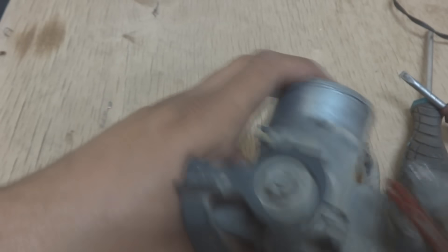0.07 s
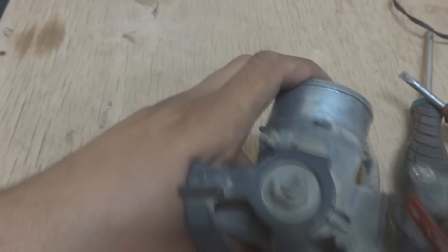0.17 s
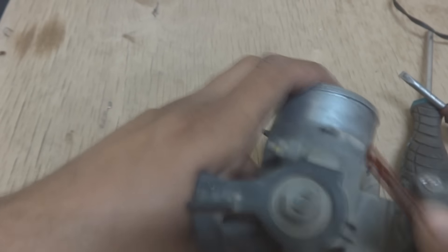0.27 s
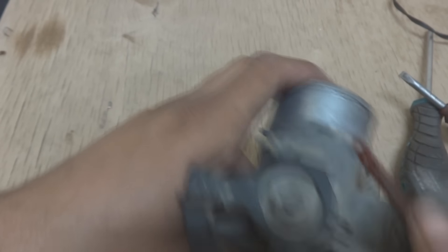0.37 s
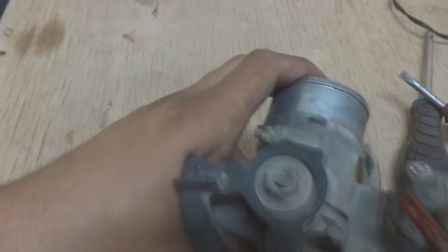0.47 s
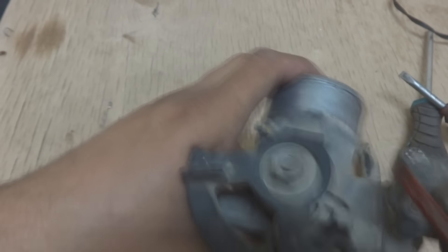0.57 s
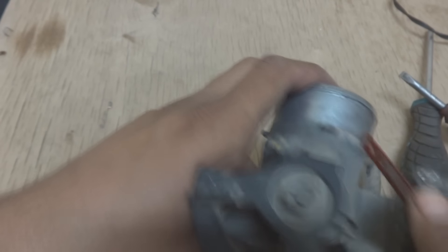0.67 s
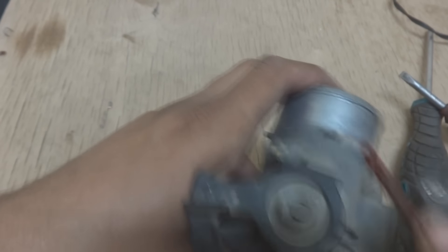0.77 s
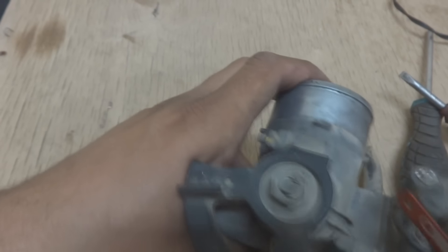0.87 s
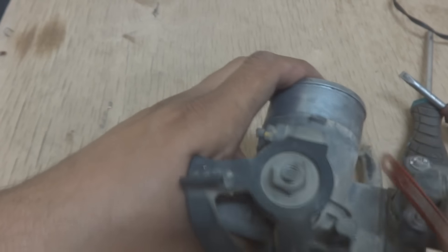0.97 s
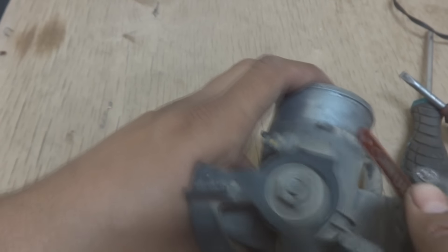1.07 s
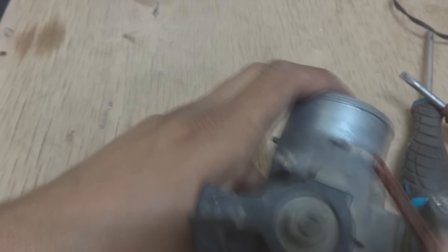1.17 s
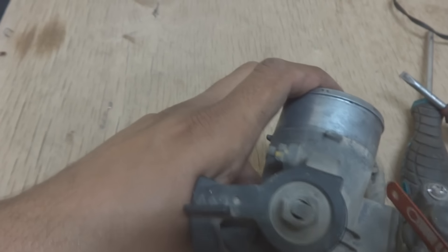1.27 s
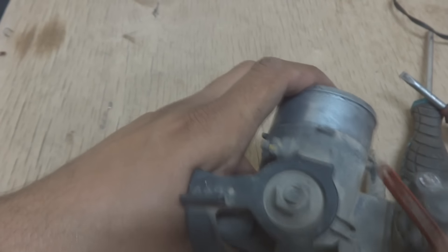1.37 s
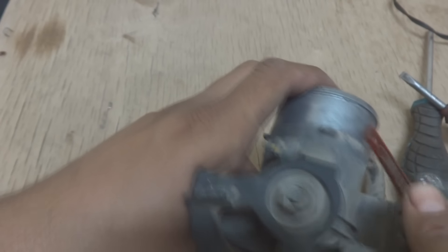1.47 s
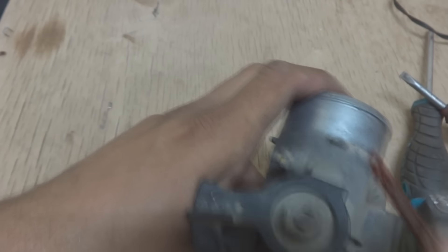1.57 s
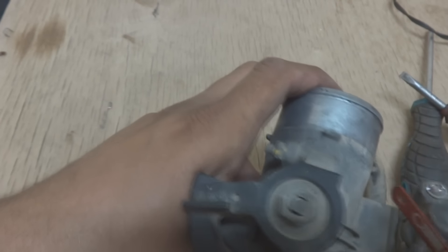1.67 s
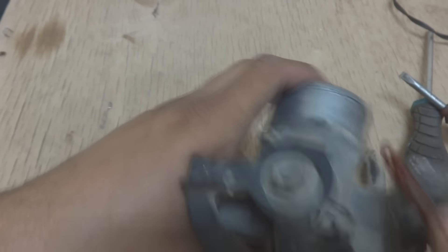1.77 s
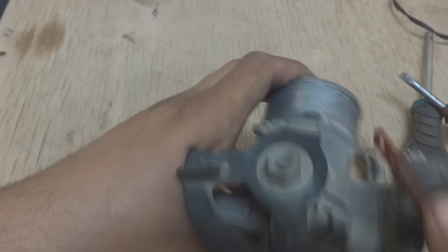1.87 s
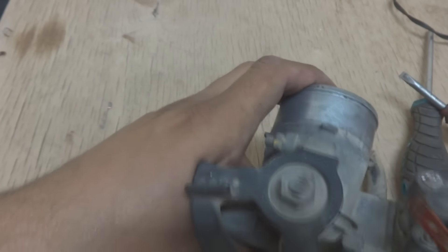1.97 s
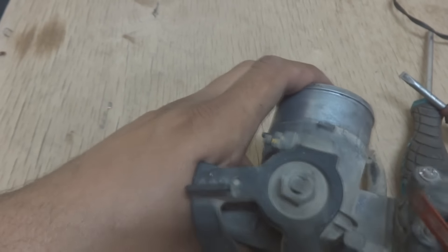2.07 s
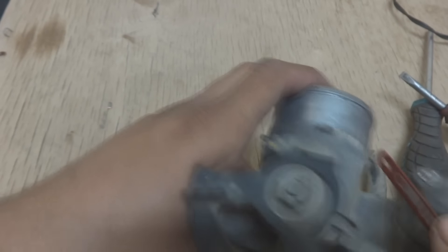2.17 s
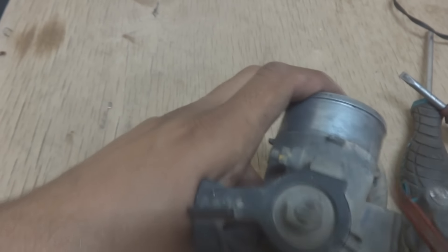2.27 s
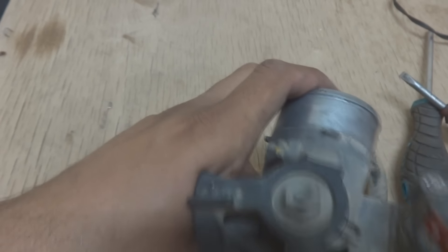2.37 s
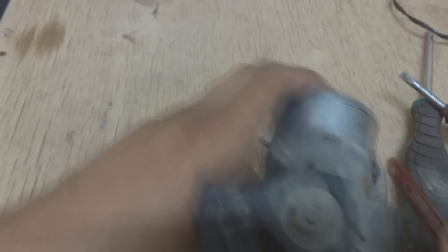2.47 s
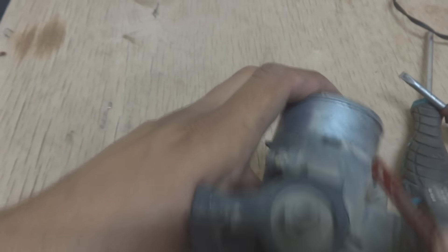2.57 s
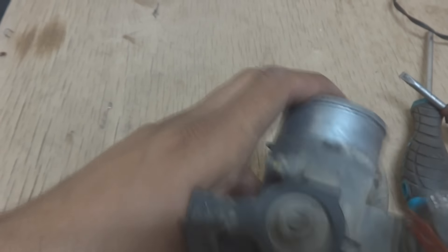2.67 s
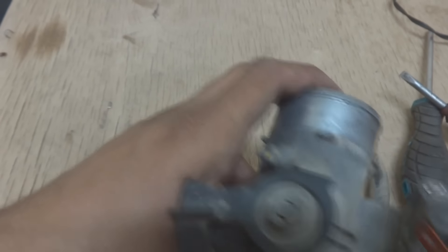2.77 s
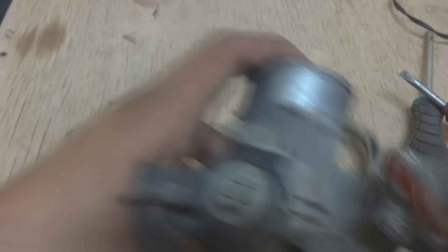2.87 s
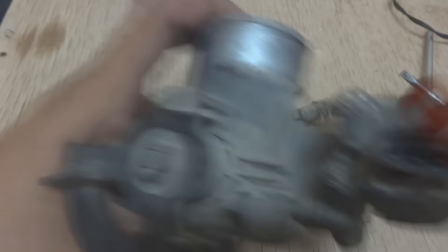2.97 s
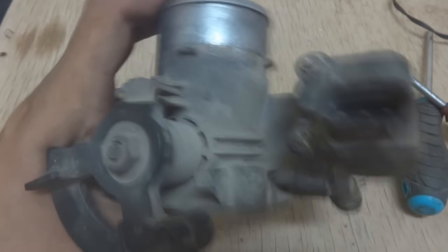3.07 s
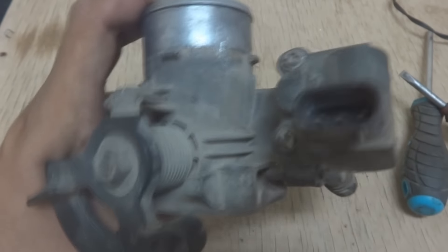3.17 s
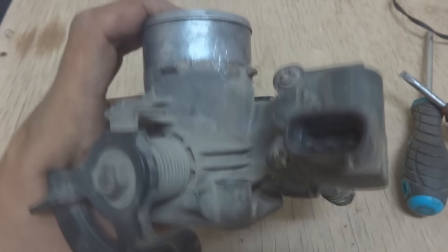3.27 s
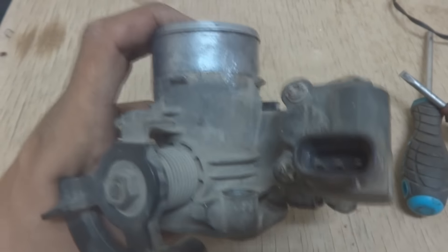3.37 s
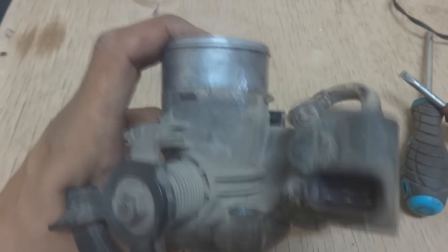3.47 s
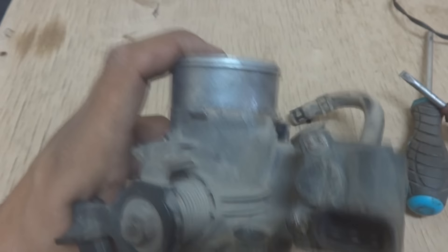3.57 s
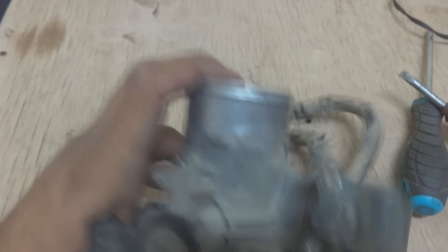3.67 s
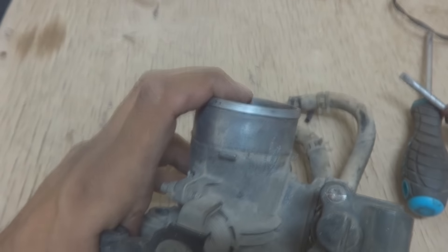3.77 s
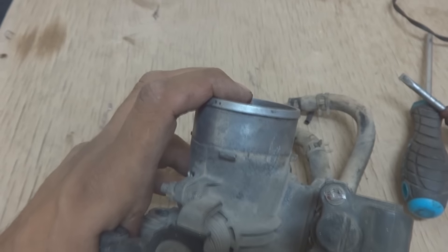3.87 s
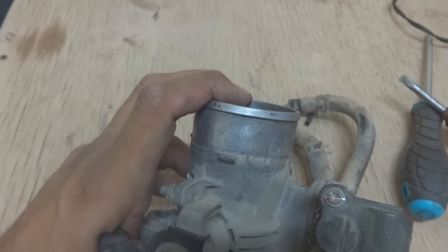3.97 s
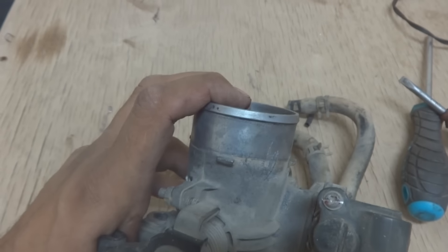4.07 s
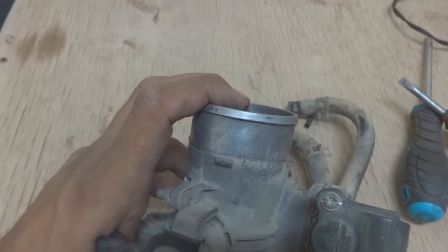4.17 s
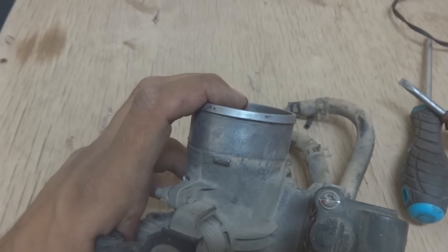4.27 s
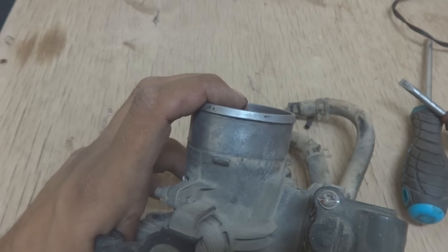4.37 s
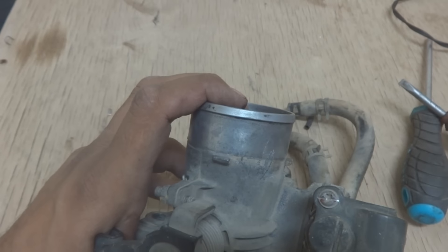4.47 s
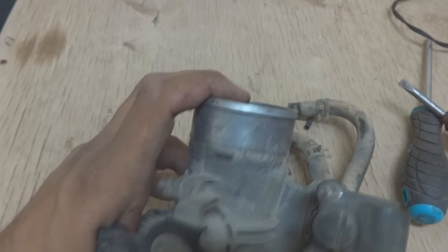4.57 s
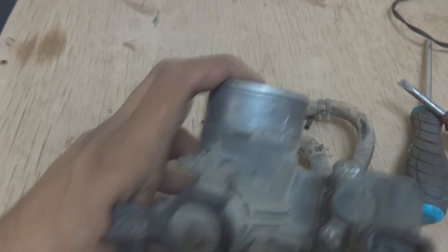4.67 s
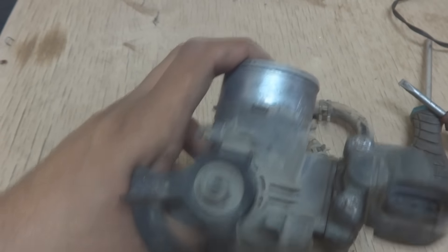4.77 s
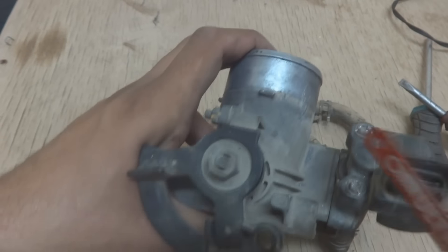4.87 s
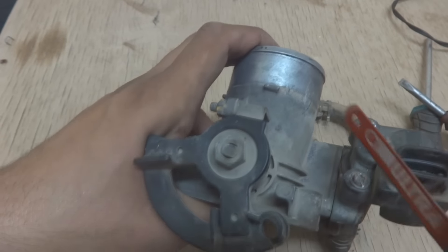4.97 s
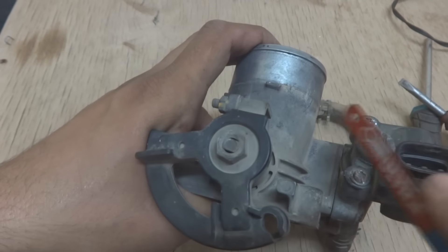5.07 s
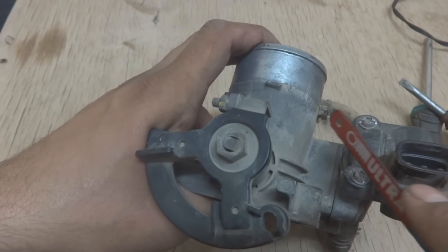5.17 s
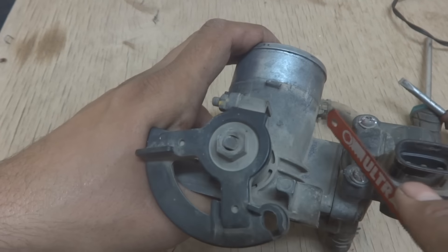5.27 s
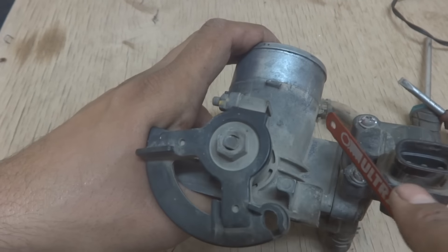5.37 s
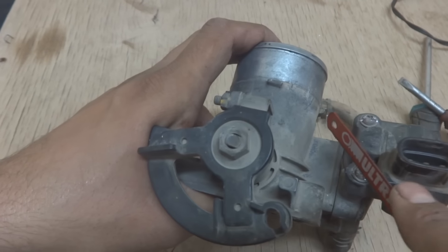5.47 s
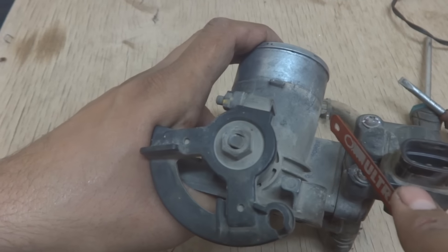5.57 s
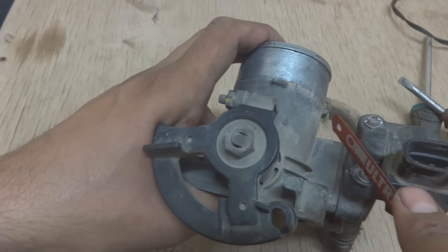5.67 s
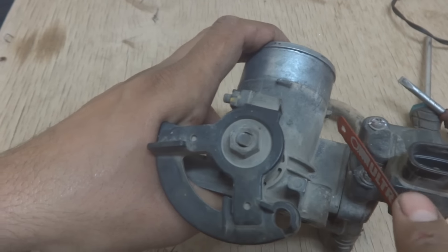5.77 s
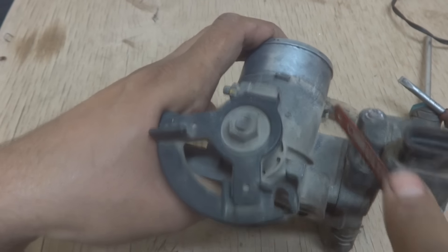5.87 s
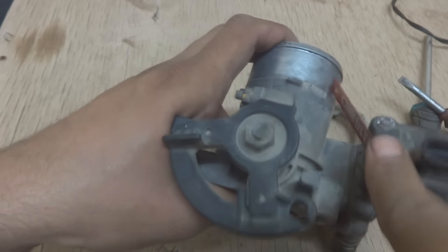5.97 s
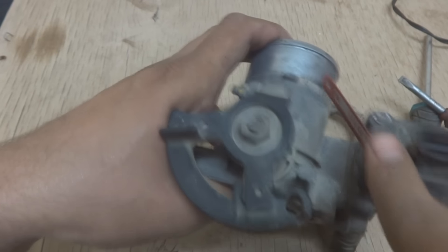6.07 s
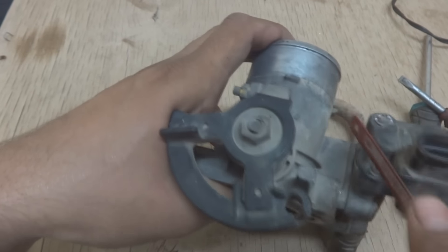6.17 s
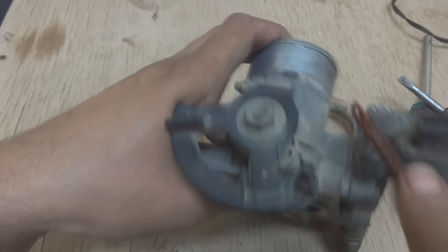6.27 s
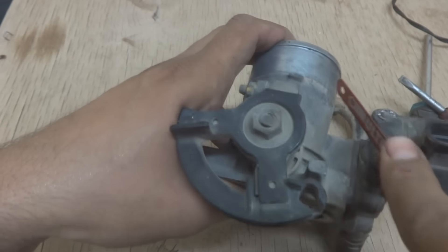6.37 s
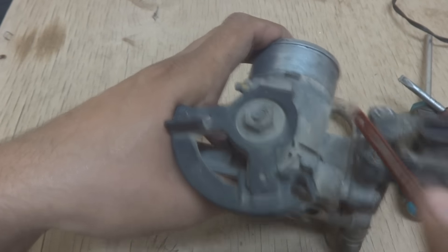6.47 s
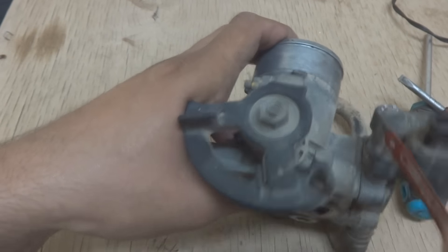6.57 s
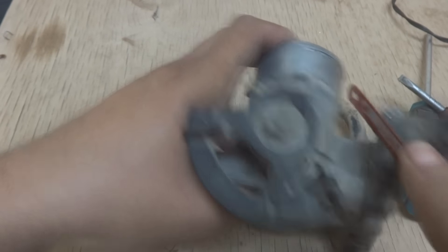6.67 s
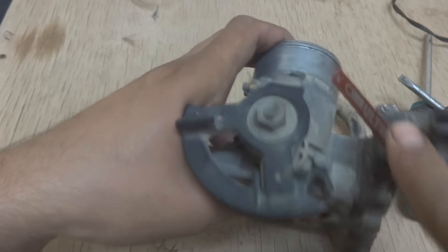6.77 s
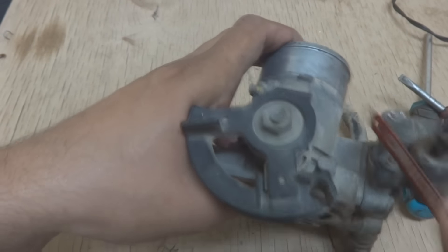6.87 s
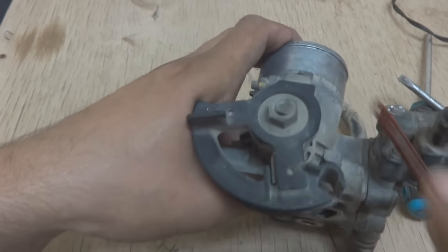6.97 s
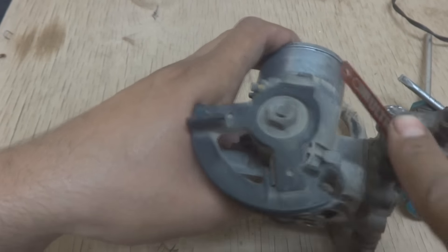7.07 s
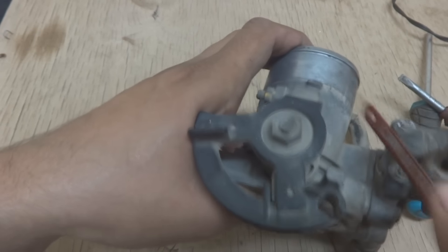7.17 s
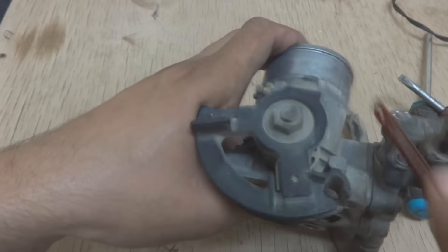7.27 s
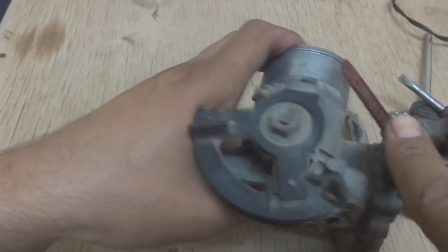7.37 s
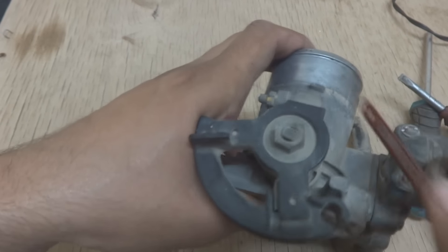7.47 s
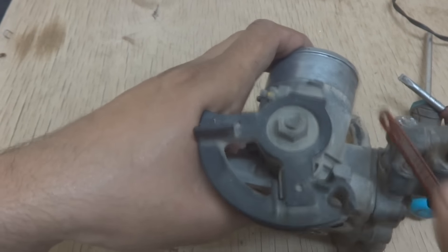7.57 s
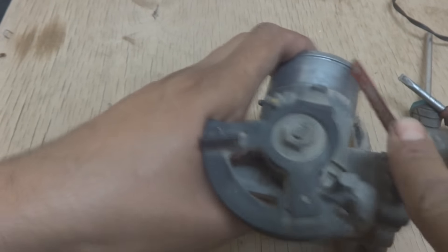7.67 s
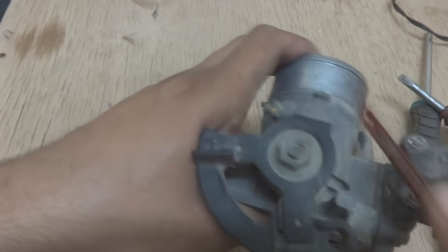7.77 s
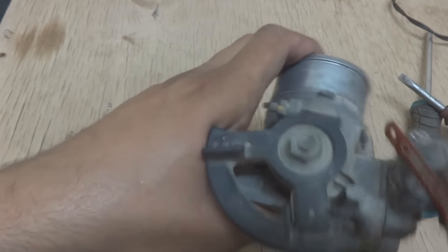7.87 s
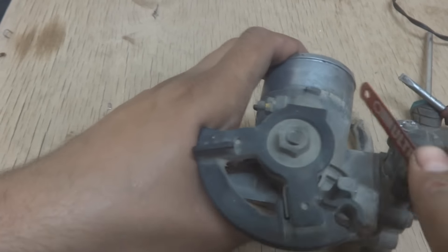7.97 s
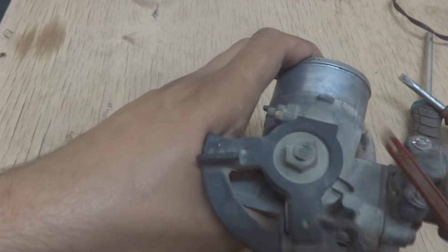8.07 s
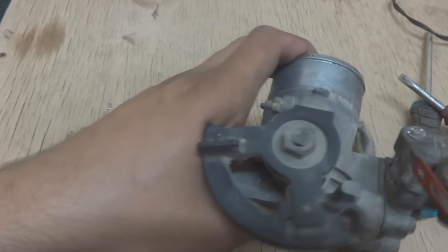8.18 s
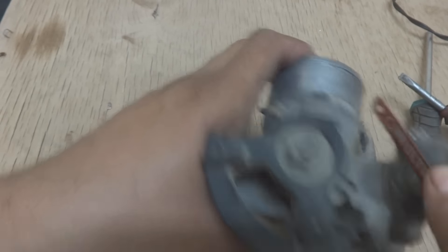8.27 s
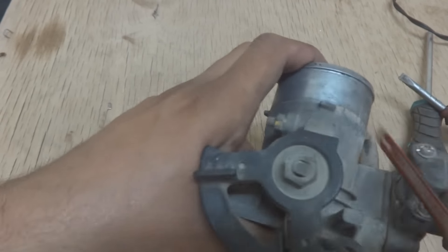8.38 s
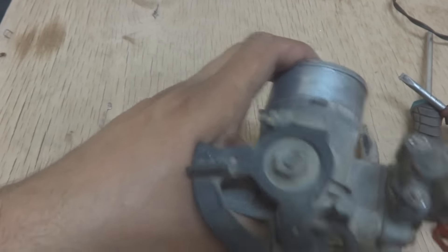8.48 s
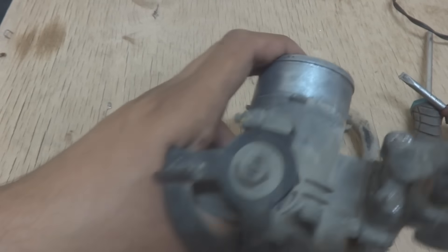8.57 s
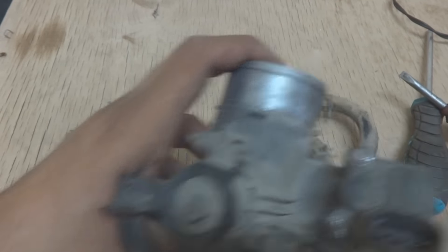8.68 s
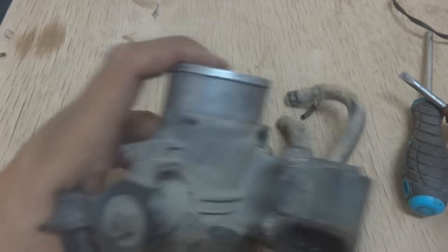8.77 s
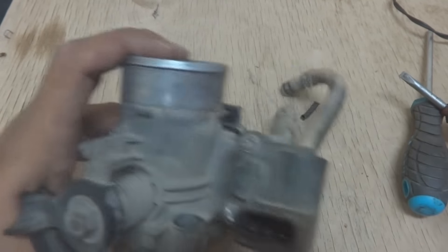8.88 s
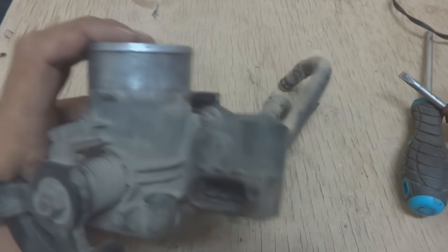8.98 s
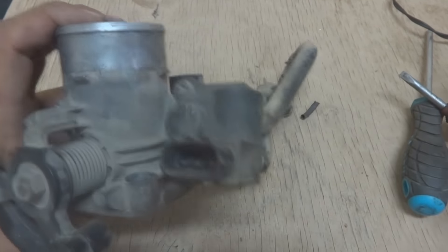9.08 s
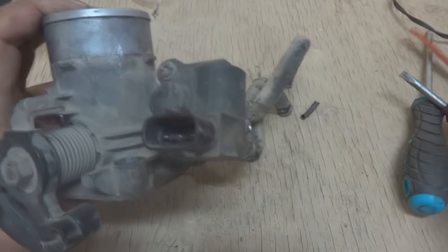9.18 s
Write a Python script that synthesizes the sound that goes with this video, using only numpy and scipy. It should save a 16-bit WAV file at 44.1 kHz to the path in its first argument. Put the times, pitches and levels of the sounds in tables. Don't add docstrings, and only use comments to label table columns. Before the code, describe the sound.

Close, slightly dull small-microphone sound of hand sawing on metal: dry gritty zips with fizzy hiss, buzzing chatter and sharp tooth snags, while the board knocks underneath. A short wooden drag and heavy clunk interrupt it. After a hushed gap with barely audible touches, sawing resumes evenly, with one loud scratchy catch late on, and finishes with the part scuffing, groaning and being rubbed brightly.

```python
import sys
import numpy as np
from scipy import signal
from scipy.fft import rfft, irfft
from scipy.io import wavfile
from scipy.ndimage import uniform_filter1d

SR = 44100
rng = np.random.default_rng(int(sys.argv[2]) if len(sys.argv) > 2 else 0)


def level_to_linear(level):
    exponent = np.asarray(level, float) / 20
    return 10 ** exponent


def file_out(sig):
    cols = np.atleast_2d(sig).T
    lim = np.clip(cols, -1, 1)
    pcm = np.round(lim * 32767).astype(np.int16)
    wavfile.write(sys.argv[1], SR, pcm)


N = 406161


def evened(x):
    return x / np.sqrt(np.mean(x ** 2) + 1e-20)


def read(points, hz):
    f, value = np.transpose(points)
    return np.interp(np.log(hz + 1), np.log(f + 1), value)


def along(tables, column, rest, fade=0.014, bulge=0.):
    s, value = [], []
    for rows in map(np.array, tables):
        s += [rows[0, 0] - fade / 2, *rows[:, 0], rows[-1, 0] + fade]
        value += [rest or rows[0, column], *rows[:, column], rest or rows[-1, column]]
    t, s = np.arange(N) / SR, np.maximum.accumulate(s)
    if bulge:
        return np.log(np.interp(t, s, np.exp(bulge * np.array(value)))) / bulge
    return np.interp(t, s, value)


def arch(row, top, ends=(0, 0)):
    start, rise, fall = row[:3]
    return [(start, top + ends[0]), (start + rise, top), (start + rise + fall, top + ends[1])]


def swell(rows, ends_db, rest_db, bulge=0.):
    return level_to_linear(along([arch(row, row[3], ends_db) for row in rows], column=1, rest=rest_db, bulge=bulge))


def colour(x, points):
    gain = np.log(level_to_linear(read(points, abs(np.fft.fftfreq(4096, 1 / SR)))))
    taps = np.fft.ifft(np.exp(gain - 1j * signal.hilbert(gain).imag)).real[:2048]
    return signal.oaconvolve(x, taps)[:len(x)]


def resonate(x, hz, width_hz):
    r = np.exp(-np.pi * width_hz / SR)
    if np.ndim(hz) == 0:
        c = r * np.cos(2 * np.pi * hz / SR)
        return signal.lfilter([2 * (1 - r), -2 * (1 - r) * c], [1, -2 * c, r * r], x)
    turn = np.exp(2j * np.pi * np.cumsum(hz) / SR)
    return 2 * (turn * signal.lfilter([1 - r], [1, -r], x / turn)).real


def twice(x, hz, width_hz, second_width_hz):
    return evened(resonate(resonate(x, hz, width_hz), hz, second_width_hz))


def band(x, lo_hz, hi_hz):
    return signal.sosfilt(signal.butter(3, [lo_hz, hi_hz], "bandpass", fs=SR, output="sos"), x)


def lumps(seconds):
    width = round(seconds * SR)
    return evened(uniform_filter1d(uniform_filter1d(rng.standard_normal(N), width), width))


def grains(per_s, spread_db):
    size = level_to_linear(spread_db * np.minimum(rng.exponential(1, N), 4))
    return evened(size * (rng.random(N) < per_s / SR) * rng.choice([-1., 1.], N))


# frequency in Hz, level in dB per Hz.
HUSH = [(15, -45.5), (25, -17), (140, -4), (247, -11.5), (434, -16.5), (948, -21.5), (1580, -29),
        (3360, -34.5), (9100, -43.5), (15600, -49)]
# frequency in Hz, left-right likeness from -1 to 1.
HUSH_SAME = [(60, 1), (240, 0.38), (950, -0.77), (3770, -0.25), (15000, 1)]


def hush():
    frames, hz = N // 512 + 5, np.fft.rfftfreq(2048, 1 / SR)
    a, b, c, d, patches = rng.standard_normal((frames, 1025, 5)).T
    patches = evened(uniform_filter1d(uniform_filter1d(patches, 14, 0), 6, 1))
    same, left = np.clip(read(HUSH_SAME, hz), -1, 1)[:, None], a + 1j * b
    z = np.array([left, same * left + np.sqrt(1 - same ** 2) * (c + 1j * d)])
    z *= level_to_linear(read(HUSH, hz)[:, None] + 1.3 * patches)
    return level_to_linear(-54) * evened(signal.istft(z, nperseg=2048, noverlap=1536)[1][:, :N])


# frequency in Hz, t60 in seconds.
ROOM = [(100, .36), (500, .27), (2000, .19), (8000, .16), (16000, .12)]


def room(x, wide=0.64):
    taps = np.zeros((3, SR // 2))
    at = np.arange(120, SR // 2 - 20, 20)
    at = at + rng.integers(0, 20, (3, len(at)))
    np.put_along_axis(taps, at, rng.choice([-1., 1.], at.shape), 1)
    hz, t, z = signal.stft(taps[2] + wide * taps[:2], SR, nperseg=256)
    tail = signal.istft(z * level_to_linear(-60 * t / read(ROOM, hz)[:, None]), SR, nperseg=256)[1]
    return signal.fftconvolve(x[None], tail / np.linalg.norm(tail[0]), axes=1)[:, :N]


# start in seconds, rise in seconds, fall in seconds, level in dB,
# centre of the hiss in Hz.
SLIDES = [
    (2.871, 0.24, 0.054, -44.5, 2620),
    (3.17, .02, .22, -61, 1600),
    (3.746, 0.12, 0.08, -42, 2100),
    (4.749, 0.1616, 0.27, -64.5, 1835),
    (8.621, 0.097, .17, -42.5, 1500),
    (8.88, 0.0087, 0.094, -49.5, 1460),
    (8.968, .008, 0.15, -49, 1790),
    (9.139, 0.047, 0.102, -39.5, 3870),
]
# frequency in Hz, level in dB per Hz.
SLIDE_COLOUR = [(290, -42.5), (500, 2), (851, -9), (968, -5), (2690, -22), (3850, -15.5), (15500, -51)]
# frequency in Hz, width in Hz, level in dB.
SLIDE_RINGS = [(920, 40, 0.5), (1370, 32, 5.5), (1600, 45, 2.5), (1873, 39, -8.5), (2414, 64, 0)]
# start in seconds, rise in seconds, fall in seconds, level in dB.
GROANS = [
    (2.93, 0.085, 0.0625, -31.5),
    (8.74, 0.039, 0.1, -40.5),
    (8.884, .006, 0.076, -38.5),
    (8.968, 0.0089, 0.072, -30),
]


def slides():
    grit = grains(per_s=5000, spread_db=1.5)
    hz = along([arch(row, row[4]) for row in SLIDES], column=1, rest=0)
    share = np.clip(hz / 5500, 0, 1)
    hiss = evened(resonate(resonate(grit, hz, 0.26 * hz.mean()), hz, 1220))
    grainy = colour(grit, SLIDE_COLOUR)
    rub = (1 - share) * grainy / np.std(band(grainy, 810, 8000)) + share * hiss
    rings = evened(sum(level_to_linear(db) * resonate(grit, f, width) for f, width, db in SLIDE_RINGS))
    rub += level_to_linear(-4.5) * (1 - share) ** 2 * rings
    rub *= swell(SLIDES, (-14.5, -13.5), rest_db=-82.0) * level_to_linear(1.1 * lumps(0.018))
    groan_hz = 330
    groan = evened(resonate(resonate(grit, groan_hz * (1 + .05 * np.sin(hz / 20)), 40), groan_hz, 90))
    groan += 0.15 * evened(resonate(grit, 2 * groan_hz, 90))
    return rub + swell(GROANS, (-12, -3.5), rest_db=-76.5) * groan


# start in seconds, rise in seconds, fall in seconds,
# bite in dB, chatter in dB over the bite.
STROKES = [(-.05, 0.05, 0.043, -16.5, 1.5), (.155, 0.0042, 0.098, -19.5, -1), (0.338, 0.056, 0.04, -17, 0),
           (0.519, 0.036, 0.071, -19, 4.5), (.71, 0.059, 0.046, -22.5, 4.5), (0.908, 0.034, 0.078, -21, 5),
           (1.067, 0.11, 0.011, -27, 5), (1.314, 0.015, 0.058, -27.5, 7.5),
           (1.498, 0.055, 0.04, -30.5, 4.5), (1.668, 0.095, 0.044, -25, 6.5), (1.84, 0.054, 0.052, -47, 17),
           (2.041, 0.026, 0.096, -28.5, 4), (2.193, 0.042, 0.062, -27.5, 7),
           (2.378, 0.055, 0.043, -23, 3.5), (2.561, 0.037, 0.048, -17, 4), (2.738, 0.039, 0.097, -23, 3),
           (3.071, 0.057, 0.015, -42.5, 11)]
LATER_STROKES = [(6.035, 0.066, 0.025, -30.5, 1), (6.217, 0.03, 0.07, -28.5, 3.5),
                 (6.427, 0.018, 0.076, -27, 7), (6.544, 0.05, 0.092, -26, 3.5),
                 (6.756, 0.039, 0.063, -18, 0), (6.927, 0.079, .05, -24, 1.5),
                 (7.088, 0.058, 0.051, -19, 4.5), (7.243, 0.086, 0.025, -23, 3),
                 (7.409, 0.041, 0.044, -19.5, 4), (7.54, 0.084, 0.034, -20, 1),
                 (7.712, 0.043, 0.049, -20, 2.5), (7.832, 0.1, 0.034, -21, 1),
                 (8.059, 0.0095, 0.058, -25, 7), (8.169, 0.017, 0.12, -23.5, -0.5),
                 (8.358, 0.029, 0.084, -20.5, 2), (8.484, 0.032, 0.11, -22, 4.5)]


def force():
    entry_db, exit_db = -24.5, -49.5
    hold, sag_db = 0.27, -1.5
    curves = []
    for row in STROKES + LATER_STROKES:
        entry, top, leave = arch(row, row[3], (entry_db, exit_db))
        held = (top[0] + hold * (leave[0] - top[0]), top[1] + sag_db)
        curves.append([entry, top, held, leave])
    return level_to_linear(along(curves, column=1, rest=-80.0, bulge=.075))


# time in seconds, level in dB.
BOUTS = [
    [(0.01, -50), (3.1, -59)],
    [(6.05, -55), (8.62, -47.5)],
]
# time in seconds, sway in dB, knock in dB.
LURCHES = [(0.801, -53, -32.5), (1.13, -36, -32.5), (1.56, -36.5, -44), (2.28, -39.5, -37.5),
           (2.77, -40, -41), (3.02, -47, -36), (3.88, -41, -28), (6.27, -42, -42), (7.2, -35.5, -35),
           (7.47, -33, -38), (7.93, -41, -39), (8.55, -45, -29), (8.85, -66, -44), (9.0, -59.5, -33.5)]


def rocking(part):
    rest_db, shove_db = (-51.5, -43.5)[part], (-19, -16)[part]
    lag_s = (0.073, 0.026)[part]
    rise_db_per_s, fall_db_per_s = (174.5, 267.5)[part], (59, 121.5)[part]
    t, r = np.arange(N) / SR, np.exp(-1 / (lag_s * SR))
    spans = [[(a[0], rest_db), (b[0], rest_db)] for a, b in BOUTS]
    held = level_to_linear(along(spans, column=1, rest=-99., fade=0.18))
    out = held + level_to_linear(shove_db) * signal.lfilter([1 - r], [1, -r], force())
    for row in LURCHES:
        late = t - row[0]
        out = np.maximum(out, level_to_linear(row[1 + part] + np.minimum(rise_db_per_s * late, -fall_db_per_s * late)))
    return out


# frequency in Hz, level in dB, t60 in seconds.
BENCH = [(144, -2, .3), (168, 0, .26), (237, -12, .14), (307, -9, .12), (404, -14, .1), (528, -9, .09)]
# start in seconds, rise in seconds, fall in seconds, level in dB.
WOBBLES = [
    (3.795, 0.035, 0.04, -27.5),
    (3.89, 0.022, 0.22, -21),
]


def bench():
    shake = grains(per_s=650, spread_db=1.5)
    modes = sum(level_to_linear(0.18 * db) * resonate(shake, hz, 8.8 / t60) for hz, db, t60 in BENCH)
    knock = evened(band(modes, 130, 395))
    sway = twice(rng.standard_normal(N), 67, 22, 90)
    out = rocking(part=0) * sway + rocking(part=1) * level_to_linear(2.5 * lumps(0.031)) * knock
    return out + swell(WOBBLES, (-11, -23), rest_db=-99.) * twice(shake, 149.3, 35, 60)


# frequency in Hz, level in dB per Hz.
THUMP = [(35, -46), (60, -21.5), (151, -1), (215, -3), (600, -10), (1000, -17), (2000, -29), (5000, -52.5),
         (11000, -120)]
# time in seconds, peak in dB, crack in dB over the thump.
LANDING = [
    (2.709, -12.5, -26),
    (3.838, -9, -7),
    (3.854, 1.5, -12),
    (3.866, -3.5, -30),
    (3.919, -18.5, -45),
    (8.021, -14.5, -27),
    (8.136, -12.5, -27),
    (8.886, -24, -5),
    (8.973, -20, 1.5),
]


def landings():
    dull = evened(colour(rng.standard_normal(N), THUMP))
    crack = evened(band(rng.standard_normal(N), 1400, 6200))
    body = evened(band(rng.standard_normal(N), 440, 1030))
    shiver = evened(resonate(rng.standard_normal(N), 1450, 350))
    t, out = np.arange(SR // 2) / SR, np.zeros(N)
    ring = sum(level_to_linear(db - 60 * t / t60) * np.sin(2 * np.pi * hz * t) for hz, db, t60 in BENCH)
    for s, db, crack_db in LANDING:
        now = slice(round(s * SR), min(round(s * SR) + len(t), N))
        u = t[:now.stop - now.start]
        blow = level_to_linear(-18.5) * ring[:len(u)]
        blow += (level_to_linear(-8.5 - 60 * u / 0.057) + level_to_linear(-36.5 - 60 * u / 0.69)) * dull[now]
        blow += level_to_linear(-63.0 - 60 * u / 1.45) * shiver[now]
        blow += level_to_linear(-30.5 - 60 * u / 0.34) * body[now]
        blow += level_to_linear(crack_db - 27.0 - 60 * u / 0.057) * crack[now]
        rise = np.minimum(u / 0.00145, 1) ** 2
        out[now] += level_to_linear(db) * rise * blow
    return out


# time in seconds, peak in dB, frequency in Hz, t60 in seconds.
KNOCKS = [(0.773, -25.5, 193.3, 0.43), (1.574, -13, 590, 0.091), (1.582, -22, 330, 0.13),
          (1.916, -31, 186, 0.19), (7.839, -29.5, 199, 0.29), (3.876, -13.5, 159.3, 0.11),
          (3.882, -12, 318, 0.081), (.372, -17.5, 581, 0.118), (8.44, -16, 814, 0.041),
          (1.512, -28.5, 953, 0.14), (8.775, -30.5, 338, 0.11), (8.818, -27.5, 330, 0.086),
          (8.824, -30, 157.7, .12), (8.888, -20, 332, 0.1), (8.973, -23.5, 149, 0.23),
          (8.976, -23, 331.7, 0.22), (9.019, -22.5, 156, 0.18), (9.052, -35.5, 330, 0.12),
          (9.055, -24, 153, 0.14),
          (2.712, -33, 1290, .09),
    (2.71, -30, 880, .05),
]


def knocks():
    out, t = np.zeros(N + SR), np.arange(SR // 2) / SR
    for s, db, hz, t60 in KNOCKS:
        rise = np.minimum(t * hz / 1.4, 1)
        out[round(s * SR):][:len(t)] += rise * level_to_linear(db - 60 * t / t60) * np.sin(2 * np.pi * hz * t)
    return out[:N]


# frequency in Hz, level in dB per Hz.
GRIT = [(500, -19), (950, -1), (1400, -8), (2100, -7.5), (3500, -14.5), (4100, -12.5), (7400, -1),
        (15600, -10)]
# frequency in Hz, width in Hz, level in dB.
CASTING = [(971, 120, 5.5), (1229, 50, -8), (1728, 320, -2)]


def casting(force, shifting_db=0.):
    drift = np.ones(4)
    if shifting_db:
        drift = level_to_linear(shifting_db * np.clip([lumps(0.015) for _ in range(4)], -2, 1.3))
    rings = sum(level_to_linear(db) * resonate(force * drift[k % 4], hz, width) for k, (hz, width, db) in enumerate(CASTING))
    return colour(force * np.sqrt(drift[3]), GRIT) + level_to_linear(-1.) * rings


# frequency in Hz, width in Hz, level in dB.
BLADE = [(5100, 1100, -5), (6230, 520, -3), (7010, 110, -9), (7850, 600, -8), (8440, 150, -1),
         (9220, 110, -12), (10100, 800, -13), (11800, 650, -13), (14000, 750, -13)]


def blade(force, chance):
    shift_db = 6
    out = level_to_linear(-4 + shift_db / 2 * chance[::-1]) * colour(force, GRIT)
    for k, (hz, width, db) in enumerate(BLADE):
        ring = resonate(resonate(force, hz, width), hz, 2 * width)
        out += level_to_linear(db + shift_db * np.roll(chance, k * SR // 3)) * ring
    return out


# time in seconds, peak in dB, blade ring in Hz.
SNAGS = [(0.162, -18, 6400), (0.348, -34, 8700), (0.3734, -34, 3440), (0.524, -30.5, 5670),
         (3.123, -29.5, 2900), (0.9203, -33.5, 7000), (3.749, -46, 2100), (1.172, -16, 6600),
         (1.3202, -20.5, 7160), (1.3448, -29, 6200), (1.5749, -15.5, 6100), (1.72, -18, 6100),
         (1.8777, -29.5, 3110), (2.057, -41, 7200), (2.1952, -37, 8300), (2.5655, -32, 3600),
         (2.592, -36, 9000), (2.7545, -41, 6300), (2.779, -25.5, 5760), (3.0867, -28, 9660),
         (1.736, -20, 7150), (1.583, -11.5, 2840), (1.741, -20, 2590), (1.341, -14.5, 2100),
         (2.411, -20, 2000),
         (6.976, -20.5, 2370), (7.781, -8, 3220), (6.281, -25, 2760), (6.298, -21, 2500),
               (7.574, -23, 2560), (7.004, -15.5, 2330), (7.305, -18, 2410), (7.336, -17, 2580),
               (7.63, -36, 6100), (7.798, -9, 2970), (8.442, -31, 3300), (6.043, -40, 3930),
               (6.087, -21.5, 6230), (6.1711, -26, 6100), (6.235, -26, 5900), (6.437, -33, 9650),
               (6.781, -14.5, 4100), (6.934, -22, 2520), (7.115, -35, 5950), (7.25, -37, 8450),
               (7.2656, -27, 5000), (7.6184, -27, 8400), (7.7196, -39, 8440), (7.778, -20, 6190),
               (7.85, -19, 6200), (7.949, -32, 5340), (8.067, -22, 3100), (8.173, -30, 8400),
               (8.371, -14, 4060),
         (0.114, -35.5, 3220), (0.4118, -10.5, 2850), (0.449, -27.5, 2950), (0.5046, -32, 3080),
           (1.25, -31, 3350), (1.552, -40, 6640), (1.652, -37, 6460), (1.687, -24, 7170),
           (1.858, -38, 3520), (1.933, -31, 3220), (2.944, -42.5, 6350), (3.0018, -29.5, 5350),
           (3.1259, -26.5, 9420), (4.875, -54.5, 5200), (5.2755, -50, 5740), (5.661, -48.5, 3450),
           (7.227, -34, 3140), (7.4702, -20, 8340), (7.547, -30, 8100), (8.5938, -20.5, 3740),
           (8.9326, -34, 4040), (5.277, -49, 3000), (5.659, -47.5, 980), (5.31, -60, 3200),
           (4.92, -57, 4360)]


def snags():
    burst, ring, t = np.zeros(N), np.zeros(N), np.arange(2600) / SR
    for s, db, hz in SNAGS:
        puff = rng.standard_normal(len(t))
        at = round(s * SR)
        burst[at:at + len(t)] += (level_to_linear(db - 60 * t / 0.018) * np.minimum(t / 0.00028, 1) * puff)[:N - at]
        shiver = 1 + 6.8 * uniform_filter1d(puff, size=30)
        ring[at:at + len(t)] += (level_to_linear(db - 60 * t / 0.031) * shiver * np.sin(2 * np.pi * hz * t))[:N - at]
    unit = np.std(band(casting(rng.standard_normal(SR)), 3000, 16000))
    struck = level_to_linear(-6.5) * band(casting(burst), 590, 8300) + level_to_linear(-24.0) * blade(burst, 0 * burst)
    return struck / unit + level_to_linear(-6.5) * ring


# low ring in Hz, low ring in dB, upper ring in Hz,
# upper ring in dB, top fizz in dB.
SEATING = [(2500, 2, 3200, -3, -6.5), (2500, 7.5, 3700, -5.5, -3.5), (2590, 1.5, 3300, -3.5, -1),
           (2500, 5, 3400, -4, -1.5), (2560, -0.5, 3300, 0.5, 1), (2468, 8.5, 3200, -2, 0),
           (2560, 1.5, 3300, 2, 2.5), (2500, 12.5, 680, -11, 3.5), (2580, -10.5, 2500, -5, 1),
           (2487, 9, 3200, -3.5, 4), (2600, 4, 3500, -8, 1), (2560, -3, 3250, 0.5, 4.5),
           (2570, 0, 3350, 3.5, 4), (2560, 7.5, 3200, -9, -0.5), (2500, -2, 3420, -1.5, -3.5),
           (2560, -4, 3150, -2, 0), (2620, -14, 2850, -22, 12), (2500, -4, 2930, 4, 5.5),
           (2580, 0, 3100, -0.5, 7.5), (2500, -3, 3200, 2, -1.5), (2580, -2, 3250, 2, 5.5),
           (2500, -2, 3320, 3.5, 0.5), (2360, -10, 3080, 0, 3), (2500, -2, 3400, 2, -5),
           (2330, 1.5, 2900, -8, 1.5), (2500, -6, 3440, -0.5, -4), (2320, 5, 1380, -2, 0.5),
           (2500, -6, 3330, -0.5, -2.5), (2390, 5, 2840, -4, -1.5), (2500, -6, 3400, -1, -3),
           (2500, 5, 3230, -5, 2), (2500, -1.5, 3380, 3.5, -2), (2500, -1.5, 3200, 0.5, 3)]


def seated(column):
    rows = zip(STROKES + LATER_STROKES, SEATING)
    return along([arch(row, seat[column]) for row, seat in rows], column=1, rest=0)


def by_way(values, ends=(0, 0)):
    curves = [arch(row, values[k % 2], ends) for bout in (STROKES, LATER_STROKES) for k, row in enumerate(bout)]
    return along(curves, column=1, rest=0)


# time in seconds, peak in dB.
CLUMPS = [(0.1126, -32), (0.1605, -2), (0.3561, -27.5), (0.3716, -7), (0.409, -14), (0.5102, -24),
          (0.5366, -6), (0.5435, -5), (0.7203, -33), (0.7296, -19.5), (0.7512, -21.5), (0.8984, -28),
          (0.9213, -13), (1.0959, -37), (1.1114, -14), (1.1496, -12.5), (1.1711, -8.5), (1.3187, -15.5),
          (1.3405, -13), (1.509, -34), (1.5374, -20.5), (1.5517, -12.5), (1.5728, -6), (1.6686, -18.5),
          (1.6876, -32), (1.7205, -19.5), (1.7367, -8), (1.8582, -30.5), (1.878, -26.5), (1.9313, -30.5),
          (2.0582, -33.5), (2.0692, -31.5), (2.1949, -27.5), (2.2114, -24), (2.2524, -13.5), (2.3763, -24),
          (2.389, -17), (2.397, -18), (2.4114, -18), (2.4231, -1.5), (2.5716, -35), (2.5925, -22),
          (2.7536, -15), (2.7796, -28), (3.0011, -14),
          (6.0427, -22), (6.0612, -24.5), (6.087, -17), (6.1719, -28), (6.2358, -24), (6.2623, -20),
                (6.279, -21), (6.2978, -16), (6.4373, -27), (6.462, -34), (6.56, -28), (6.596, -32),
                (6.7663, -17.5), (6.786, -21), (6.9333, -16.5), (6.977, -23), (6.9915, -16), (7.0034, -17),
                (7.1136, -14), (7.129, -7.5), (7.25, -25), (7.264, -9), (7.2917, -27), (7.306, -10),
                (7.421, -27), (7.4342, -16), (7.4688, -12), (7.5458, -19.5), (7.573, -9), (7.5947, -22),
                (7.647, -6), (7.7194, -20), (7.739, -17), (7.7624, -15), (7.7793, -17), (7.794, 9),
                (7.8538, -7), (7.8865, -12), (7.918, -25), (7.946, -21), (8.0222, -31), (8.072, -25),
                (8.177, -23), (8.207, -6.5), (8.2226, -7), (8.355, -22.5), (8.371, -7.5), (8.3814, -4.5),
                (8.441, -12), (8.4843, -21), (8.501, -19), (8.598, -19.5)]


def clumps():
    t, train = np.arange(3000) / SR, np.zeros(N)
    for s, db in CLUMPS:
        train[round(s * SR)] = level_to_linear(db - 10)
    pulse = np.minimum(t / .0025, 1) * level_to_linear(-60 * t / 0.042)
    return abs(signal.oaconvolve(train, pulse)[:N])


def filing(bite, teeth, even):
    hits = bite * teeth
    loudest = resonate(hits * level_to_linear(seated(column=1)), seated(column=0) * (1 + 0.02 * lumps(0.0067)), 230)
    loudest += resonate(hits * level_to_linear(seated(column=3)), seated(column=2) * (1 + 0.035 * lumps(0.0067)), 300)
    low = casting(hits, shifting_db=5.) + level_to_linear(4.0) * loudest
    return band(low, 1000, 4100) / np.std(band(even, 720, 7500))


# start in seconds, rise in seconds, fall in seconds,
# level in dB.
SHIMMERS = [
    (1.25, .05, .02, -47.5),
    (1.655, .03, .012, -42.5),
    (6.175, .006, .06, -50),
    (7.8, 0.0068, 0.042, -34),
]


def fizz(bite, teeth, even):
    hiss = bite * level_to_linear(by_way((-3, -5.5), (-1, 6)) + 2.3 * lumps(0.0019))
    hiss *= evened(.4 * np.roll(teeth, SR) + rng.standard_normal(N))
    chance = np.clip(evened(sum(lumps(seconds) for seconds in (.006, .015, .03, .06))), -2, 1.3)
    high = blade(hiss, chance) / np.std(band(even, 2200, 21000))
    high = band(high, 4300, 9800) + level_to_linear(seated(column=4) - 1.5) * band(high, 9900, 20000)
    shimmer = twice(teeth, 6200, 200, 500)
    return high + level_to_linear(7.5) * swell(SHIMMERS, (-8, -14), rest_db=-99.) * shimmer


# time in seconds, chatter in Hz.
GRIP = [
    [(0.0, 536), (0.14, 685), (0.36, 586), (1.05, 678), (1.29, 893), (1.6, 583), (1.72, 611), (2.39, 611),
     (2.9, 664)],
    [(6.0, 824), (6.27, 630.3), (6.9, 739), (7.14, 626), (7.3, 651), (8.12, 664), (8.21, 578.6),
     (8.39, 700), (8.7, 559)],
]


def chatter():
    hz = along(GRIP, column=1, rest=0) * (1 + 0.067 * lumps(0.033))
    drive = grains(per_s=700, spread_db=1.5)
    out = 0.39 * twice(drive, hz, 75, 82) + 0.55 * evened(band(drive, 343, 962))
    curves = [arch(row, row[4], (3, 6.5)) for row in STROKES + LATER_STROKES]
    return out * level_to_linear(along(curves, column=1, rest=0))


# start in seconds, rise in seconds, fall in seconds, level in dB.
SQUEAK = [
    (3.082, 0.056, 0.011, -40.5),
]


def saw():
    hand = force()
    bite = level_to_linear(-3) * hand + np.minimum(clumps(), level_to_linear(12) * hand) + level_to_linear(along(BOUTS, column=1, rest=-99.))
    bite *= level_to_linear(1.6 * lumps(.004) - .6)
    teeth = grains(per_s=2200, spread_db=4.0) + 0.38 * rng.standard_normal(N)
    even = casting(teeth[:SR])
    squeak = swell(SQUEAK, (-15, -48), rest_db=-99.) * twice(teeth, 9270, 120, 300)
    out = level_to_linear(-6.0) * filing(bite, teeth, even) + level_to_linear(-6.5) * fizz(bite, teeth, even)
    return out + level_to_linear(-3.0) * bite * chatter() + squeak


# frequency in Hz, left minus right in dB.
LEAN = [(40, .6), (170, 2.6), (600, 2), (1400, .4), (3000, -.2), (9000, -2.9), (14000, -2.2)]


def scene():
    work = saw() + snags() + bench() + landings() + knocks() + slides()
    heard = work + level_to_linear(-9.5) * room(band(work, 350, 21000)) + hush()
    lean = read(LEAN, np.fft.rfftfreq(N, 1 / SR)) / 2
    return irfft(rfft(heard, axis=1) * level_to_linear(np.array([lean, -lean])), N, axis=1)


def roll_off(x):
    return signal.sosfilt(signal.butter(12, 16300, fs=SR, output="sos"), x)


def record(dry):
    dry = signal.sosfilt(signal.butter(2, 28, "highpass", fs=SR, output="sos"), dry)
    dry = .65 * np.tanh(dry / .65)
    dry = signal.oaconvolve(dry, signal.firwin(1501, 15820, window=("kaiser", 9), fs=SR)[None], "same")
    return roll_off(dry)


dry = scene()
out = record(dry)
file_out(out)
```